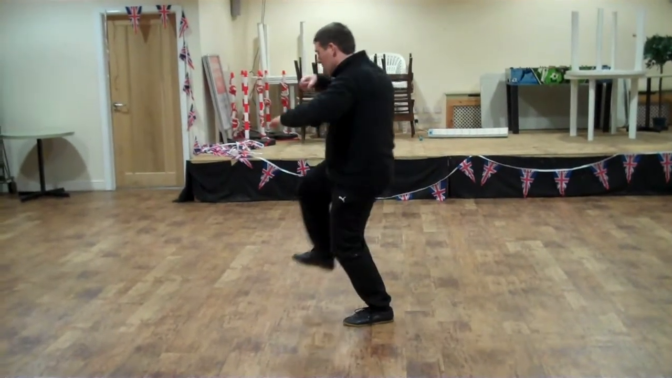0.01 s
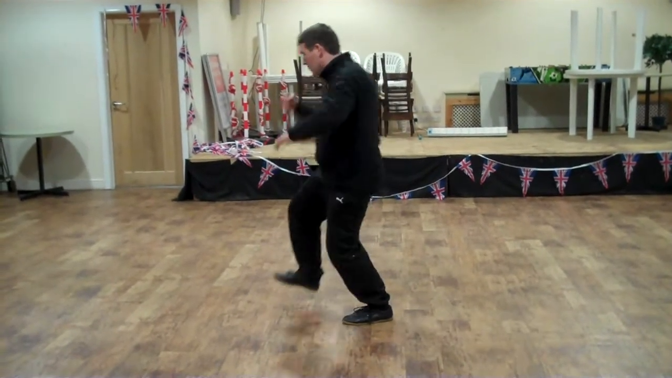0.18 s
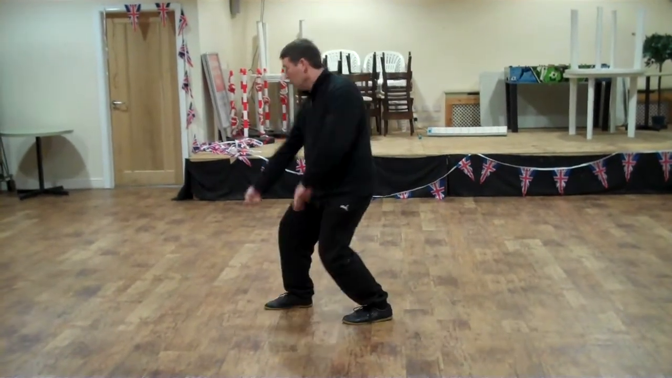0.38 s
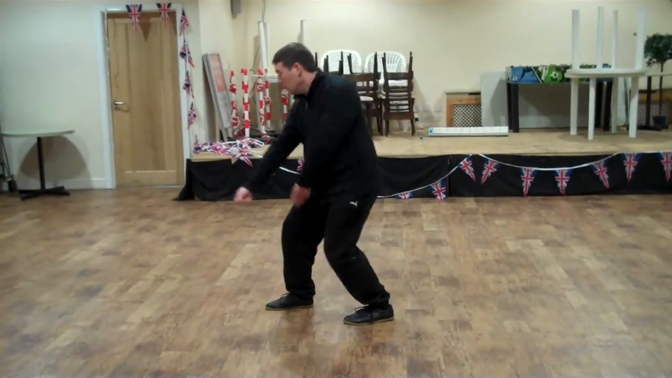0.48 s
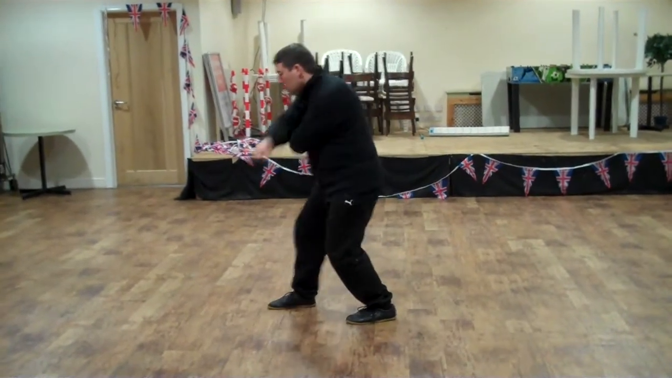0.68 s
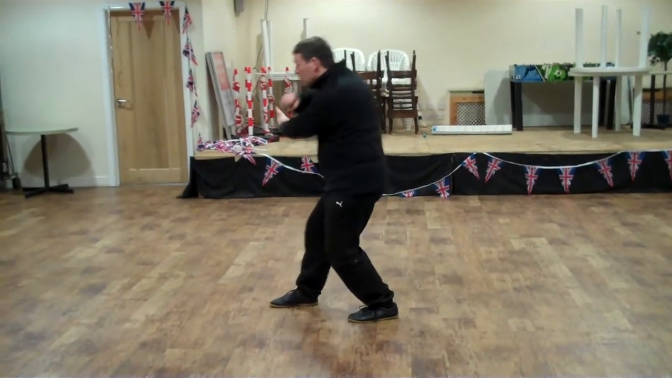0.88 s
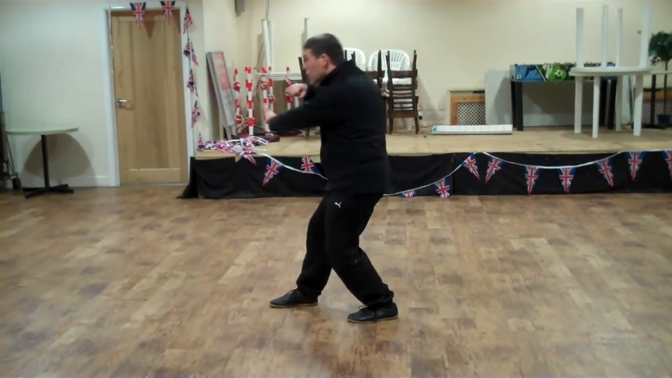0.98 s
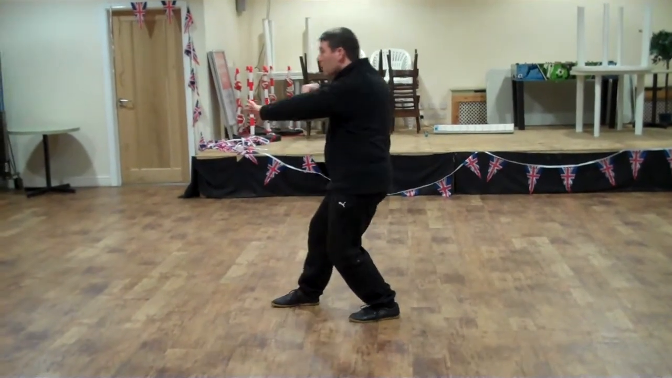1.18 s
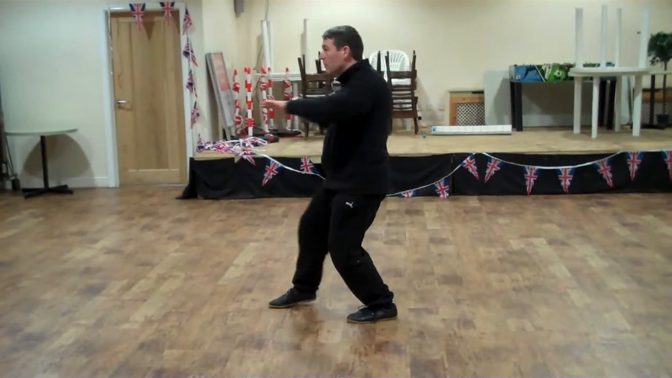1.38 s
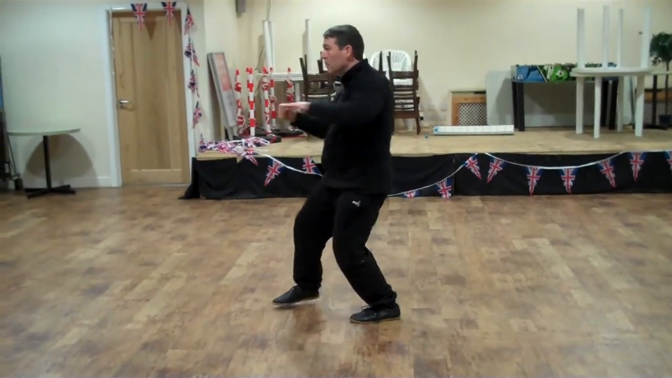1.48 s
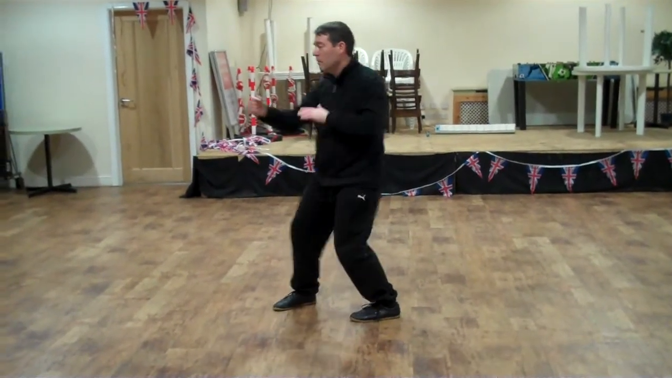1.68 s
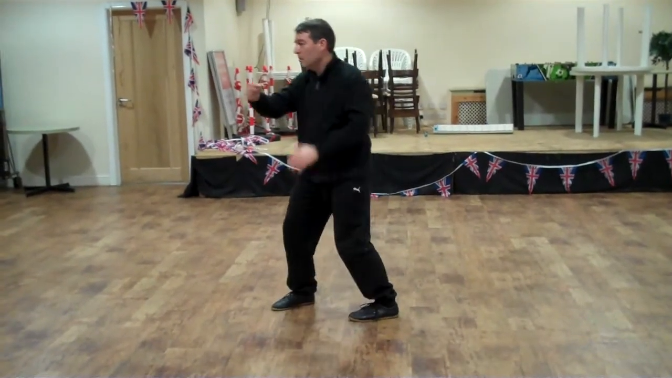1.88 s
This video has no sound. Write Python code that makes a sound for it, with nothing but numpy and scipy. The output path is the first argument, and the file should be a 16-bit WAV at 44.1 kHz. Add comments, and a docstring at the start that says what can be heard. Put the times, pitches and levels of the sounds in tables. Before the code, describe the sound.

Two foot stamps on wooden boards in a big empty hall: a loud heavy one first, a lighter, crisper one over a second later, each echoing long, heard from some distance by a simple camera microphone.

```python
"""A large empty hall with a wooden floor: two foot stamps, a heavy one and then a lighter, crisper one.
Each is a quick run of sharp slaps of sole on boards: filtered clicks with noise grit, plus decaying board tones.
The hall swells behind it and rings on: noise fading band by band, slow resonances and echoes of the slaps.
A floor thud sits under each stamp; a low sine hum and soft coloured noise lie under everything."""
import sys
import numpy as np
from scipy import signal
from scipy.fft import rfft, irfft, next_fast_len
from scipy.io import wavfile

SR = 44100
rng = np.random.default_rng(int(sys.argv[2]) if len(sys.argv) > 2 else 0)


def put_to_file(sound):
    """Save the sound as 16-bit audio at rate SR, in the file named by the first command-line argument."""
    columns = np.atleast_2d(sound).T  # one column per channel
    safe = np.clip(columns, -1, 1)
    whole_steps = np.round(safe * 32767)
    wavfile.write(sys.argv[1], SR, whole_steps.astype(np.int16))


N = 85995
TIME = np.arange(N) / SR

# stereo tilt of the hall and of the slap echoes: pitch_hz [Hz], left_minus_right_db [dB]
HALL_PAN = [(60, 1), (290, 2.2), (640, 0.49), (1400, 2.8), (3100, 4.8), (6800, 5.1), (14000, 7.1)]


def from_db(db):
    """Decibels to gain."""
    return 10 ** (np.asarray(db) / 20)


def at_hz(points, hz, axis=1):
    """Reads one column of a table on a log-frequency axis."""
    rows = np.array(points)
    return np.interp(np.log(np.maximum(hz, 1)), np.log(rows[:, 0]), rows[:, axis])


def colour(x, points, share=1):
    """Causal minimum-phase filter that follows a share of a table of (Hz, dB)."""
    size = next_fast_len(2 * N) // 2 * 2
    gain = from_db(share * at_hz(points, np.arange(size // 2 + 1) * SR / size))
    # folding the cepstrum forward in time makes the filter causal
    cepstrum = irfft(np.log(gain))
    cepstrum[1:size // 2] *= 2
    cepstrum[size // 2 + 1:] = 0
    return irfft(rfft(x, size) * np.exp(rfft(cepstrum)), size)[..., :N]


def cut(x, hz, kind, order=2):
    """Butterworth low- or high-pass."""
    sos = signal.butter(order, min(hz, SR / 2 - 1000), kind, fs=SR, output="sos")
    return signal.sosfilt(sos, x + 1e-18)


def panned(pair, points):
    """Tilts left against right by frequency, splitting the dB difference between the two sides."""
    return np.array([colour(pair[0], points, 0.66), colour(pair[1], points, -0.34)])


def diffuse_noise():
    """White stereo noise, alike in the bass and unrelated in the treble."""
    # sound arriving from all around: pitch_hz [Hz], left_right_likeness [0 to 1]
    likeness = [(60, .92), (240, 1), (500, 0.94), (950, 0.99), (1900, 0.26), (3500, 0), (14000, 0.01)]
    mid, side = rfft(rng.standard_normal((2, N)))
    alike = np.clip(at_hz(likeness, np.arange(len(mid)) * SR / N), -1, 1)
    mid = mid * np.sqrt((1 + alike) / 2)
    side = side * np.sqrt((1 - alike) / 2)
    return irfft([mid + side, mid - side], N)


def ring(clicks, hz, t60):
    """A unit click sets a sine of height 1 ringing in a two-pole resonator; it falls 60 dB in t60 seconds."""
    r = from_db(-60 / (t60 * SR))
    w = 2 * np.pi * hz / SR
    return signal.lfilter([0, np.sin(w)], [1, -2 * r * np.cos(w), r * r], clicks + 1e-18)


def smeared(x):
    """An all-pass filter spreads a click into a short wiggle without changing its colour."""
    # where a click is drawn out: pitch_hz [Hz], width_hz [Hz]
    smear = [(7000, 1900)]
    for hz, width_hz in smear:
        r = np.exp(-np.pi * width_hz / SR)
        a = [1, -2 * r * np.cos(2 * np.pi * hz / SR), r * r]
        x = signal.lfilter(a[::-1], a, x + 1e-18)
    return x


def room_noise():
    """Steady coloured air noise and a low sine hum."""
    # spectrum of the air noise: pitch_hz [Hz], level_db [dB]
    air = [(25, -31), (50, -37), (75, -55), (140, -36.5), (190, -43.5), (280, -37), (480, -38), (670, -37),
           (900, -42), (1500, -49.5), (3200, -53), (5800, -57), (7200, -51.5), (9000, -58), (13500, -62)]
    # its stereo tilt: pitch_hz [Hz], left_minus_right_db [dB]
    air_pan = [(60, 6), (600, 0.5), (1600, 5), (5000, 4.5), (14000, 1.5)]
    hum_hz, hum_db = 96.8, -58.5
    noise = panned(colour(diffuse_noise(), air), air_pan)
    return noise + from_db(hum_db) * np.sin(2 * np.pi * hum_hz * TIME)


def hall_response():
    """Grainy early echoes swell, surge off the far wall and merge into a smooth tail that dies band by band."""
    # the echo: pitch_hz [Hz], level_db [dB], t60_s [s], swell_s [s, time constant of the energy]
    hall = [(61, -24, 0.42, 0.0047), (140, -34.5, 2.3, .03), (236, -29.5, 0.93, 0.013),
            (335, -30, 1.42, 0.074), (496, -30.5, 1.72, 0.0094), (640, -29, 1.6, 0.0067),
            (990, -32.5, 1.91, 0.005), (1880, -34.5, 1.73, 0.005), (3680, -33.5, 1.14, 0.011),
            (6800, -37.5, 0.74, 0.016), (11900, -39, 0.49, 0.0038)]
    hold_s = 0.046   # the echo stays level for a while before it dies
    grain_start_db, grain_fade_s = 3.5, 0.04
    far_wall_s, far_wall_spread_s, far_wall_db = 0.084, 0.004, 3
    # the level jumps at random every 20 samples, ever less
    jumps = np.repeat(rng.standard_normal(N), 20)[:N]
    grain_db = grain_start_db * np.exp(-TIME / grain_fade_s) * jumps
    surge_db = far_wall_db * np.exp(-.5 * ((TIME - far_wall_s) / far_wall_spread_s) ** 2)
    spectrum = rfft(diffuse_noise() * from_db(grain_db + surge_db))
    # overlapping triangular bands that add up to the whole spectrum
    centres = np.geomspace(40, 16000, 27)
    place = np.interp(np.arange(spectrum.shape[1]) * SR / N, centres, np.arange(len(centres)))
    out = 0
    for k, hz in enumerate(centres):
        db, t60, swell = at_hz(hall, hz), at_hz(hall, hz, axis=2), at_hz(hall, hz, axis=3)
        fall_db = -60 * np.maximum(TIME - hold_s, 0) / t60
        band = irfft(spectrum * np.maximum(1 - abs(place - k), 0), N)
        out = out + band * from_db(db + fall_db) * np.sqrt(1 - np.exp(-TIME / swell))
    return panned(out, HALL_PAN)


def hall_modes():
    """A few resonances of the hall: sines that swell slowly and die, each at its own rate."""
    # resonances: pitch_hz [Hz], level_db [dB], t60_s [s]
    modes = [(338.2, -42.5, 1.41), (356, -46, 0.9), (628.4, -41, 1.78), (670, -44.5, 2.1),
             (686, -52.5, 3.26), (740, -55, 2.5), (760, -70, 1.7), (844, -42.5, 0.87), (936, -42.5, 1.6),
             (1169, -44.5, 1.4)]
    swell_s = 0.09
    tones = 0
    for hz, db, t60 in modes:
        tone = np.sin(2 * np.pi * (hz * TIME + rng.random()))
        tones = tones + tone * from_db(db - 60 * TIME / t60)
    return tones * (1 - np.exp(-TIME / swell_s))


def slap_echoes(direct):
    """Hard walls throw back the whole run of slaps, convolved with fading noise; the tail sounds ribbed."""
    level_db, t60_s, swell_s = -31, 1.234, 0.056
    envelope = from_db(level_db - 60 * TIME / t60_s) * (1 - np.exp(-TIME / swell_s))
    walls = panned(cut(diffuse_noise(), 1540, "high") * envelope, HALL_PAN)
    return signal.fftconvolve(direct[None], cut(walls, 3760, "low"), axes=1)[:, :N]


def floor_thud():
    """The whole sprung floor gives under the weight: one low, quickly dying sine."""
    thud_hz, thud_db, t60_s = 74.4, -49.5, 0.31
    return np.sin(2 * np.pi * thud_hz * TIME) * from_db(thud_db - 60 * TIME / t60_s)


def sole_and_boards(slaps, spectrum):
    """A run of slaps, each a click with grit and a brief clatter that also knocks the boards."""
    # short knock of the boards: pitch_hz [Hz], level_db [dB], t60_s [s]
    boards = [(180, -49, .03), (298, -56, 0.034), (410, -24, 0.035), (630, -28, 0.091), (860, -24.5, 0.02),
              (1080, -44, 0.0027)]
    # crunch of the sole just after each slap, then a longer, fainter clatter
    grit_db, grit_s = -17, 0.00084
    clatter_db, clatter_s = -30, .005
    crunch = from_db(grit_db) * np.exp(-np.minimum(TIME / grit_s, 20))
    crunch = crunch + from_db(clatter_db) * np.exp(-np.minimum(TIME / clatter_s, 20))
    sole, blows = np.zeros(N), np.zeros(N)
    for start_s, db, edge_hz, knock_db in slaps:
        i = int(start_s * SR)
        click = cut(crunch * rng.standard_normal(N), 880, "high")
        click[0] -= 1
        sole[i:] += from_db(db) * cut(click, edge_hz, "low")[:N - i]
        blows[i] += from_db(knock_db)
    sole = cut(smeared(colour(sole, spectrum)), 900, "high")
    blows = cut(blows, 260, "high")
    knocks = sum(from_db(db) * ring(blows, hz, t60) for hz, db, t60 in boards)
    return from_db(1) * sole + knocks   # the sole is lifted by 1 dB


def stamp(start, spectrum):
    """One stamp: its slaps heard directly, then the floor and the hall, which answer to their summed energy."""
    # slaps of the sole: start_s [s], level_db [dB], top_edge_hz [Hz], board_knock_db [dB]
    all_slaps = [(0.2451, -5, 8000, -3), (0.2496, -2.5, 8340, -19), (0.2522, 9, 3140, -23),
                 (0.2559, 3.5, 3800, 1.5), (.2583, -0.5, 9000, 5), (.2629, 0.5, 9600, -1),
                 (0.2689, -7, 10500, 4), (1.6082, 1, 11100, -12), (1.6105, 0.5, 4900, -10),
                 (1.6130, -2, 5800, -24), (1.6173, -7, 9050, -8), (1.6195, -6, 5000, -30),
                 (1.622, -9, 7000, -15)]
    # stereo tilt of the direct sound: pitch_hz [Hz], left_minus_right_db [dB]
    direct_pan = [(200, 3), (600, -1), (1500, 5.4), (5000, 8.2), (14000, 14)]
    stamp_s = .1         # the slaps of one stamp fall within this time
    hall_lag_s = .009    # from the first slap to the first echo
    hall_gain_db = 2     # applies to the hall and the floor thud
    slaps = np.array([row for row in all_slaps if start <= row[0] < start + stamp_s])
    direct = sole_and_boards(slaps, spectrum)
    out = panned([direct, direct], direct_pan) + slap_echoes(direct)
    slap_strength = np.linalg.norm(from_db(slaps[:, 1]))
    knock_strength = np.linalg.norm(from_db(slaps[:, 3]))
    echo = slap_strength * colour(hall_response(), spectrum)
    echo = echo + knock_strength * (hall_modes() + floor_thud())
    i = int((slaps[0, 0] + hall_lag_s) * SR)
    out[:, i:] += from_db(hall_gain_db) * echo[:, :N - i]
    return out


def scene():
    """The heavy stamp and the lighter one over the room noise."""
    # colour of each stamp: pitch_hz [Hz], level_db [dB]
    heavy = [(40, -23), (100, -5.5), (190, -1.5), (270, 6), (345, 10.5), (450, 0.5), (630, 12), (850, 10),
             (1100, 4), (1250, 4), (1370, -0.5), (1550, 6.5), (2150, 2), (2350, -2.5), (2680, 4.5),
             (3050, -3), (3550, 2.5), (4450, 0.5), (5200, 1.5), (6300, 3), (7100, 6), (7900, 2.5),
             (8700, -6), (11500, -22), (15000, -33)]
    light = [(40, -28), (100, -15), (190, -11), (330, -3.5), (430, -5.5), (530, -9.5), (680, 3), (900, 3),
             (1200, -3), (1420, 4), (1620, -7.5), (1980, 3), (2550, -0.5), (3350, -7.5), (4400, -2),
             (5800, -6.5), (7200, 0.5), (8000, -5), (8800, -13.5), (11500, -32), (15000, -28)]
    stamps = stamp(.24, heavy) + stamp(1.6, light)
    return stamps + room_noise()


def gain_control(x):
    """The recorder's gain control: loud peaks turn the gain down a little; it creeps back over about a second."""
    threshold_db, attack_s = -15.5, 0.026
    share = 0.23               # part of the overshoot that is taken off
    release_db_per_s = 11      # fall of the held overshoot, before the share is taken
    over_db = np.maximum(20 * np.log10(abs(x).max(axis=0) + 1e-9) - threshold_db, 0)
    release_db = release_db_per_s * TIME
    held_db = np.maximum.accumulate(over_db + release_db) - release_db
    r = np.exp(-1 / (attack_s * SR))
    return x * from_db(-share * signal.lfilter([1 - r], [1, -r], held_db))


def record(dry):
    """The microphone loses deep bass and its port rings in the treble; peaks round, gain ducks, the top is cut."""
    ring_hz, ring_q, ring_db = 7090, 60, -13.5
    low_cut_hz, top_cut_hz = 83, 14250
    port = signal.lfilter(*signal.iirpeak(ring_hz, ring_q, fs=SR), dry)
    picked_up = cut(dry + from_db(ring_db) * port, low_cut_hz, "high")
    heard = gain_control(np.tanh(picked_up))
    top_cut = signal.ellip(10, .05, 70, top_cut_hz, fs=SR, output="sos")
    return signal.sosfiltfilt(top_cut, heard)


dry = scene()
out = record(dry)
put_to_file(out)
```